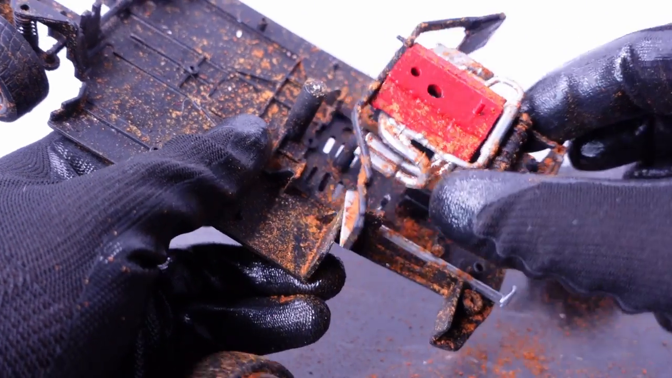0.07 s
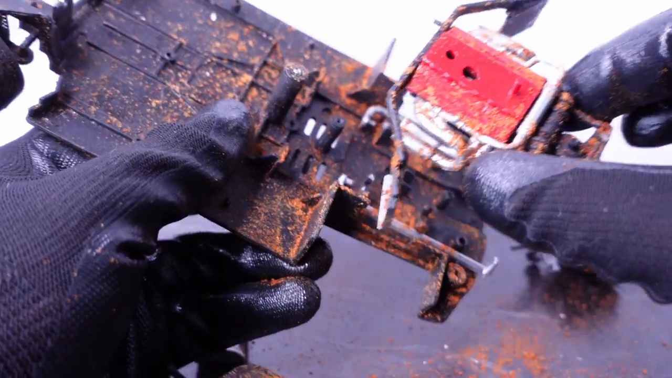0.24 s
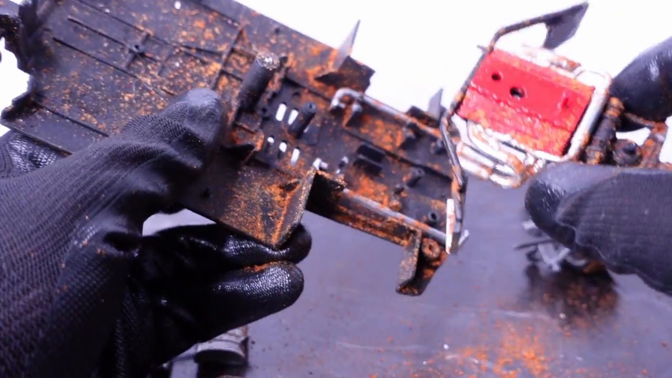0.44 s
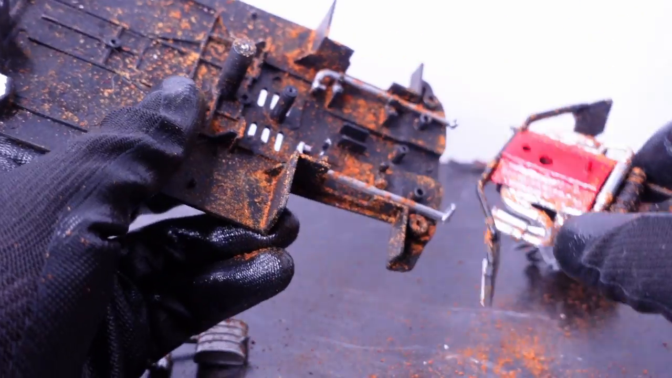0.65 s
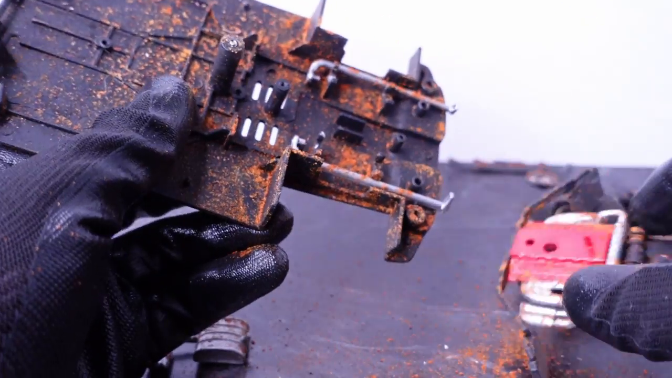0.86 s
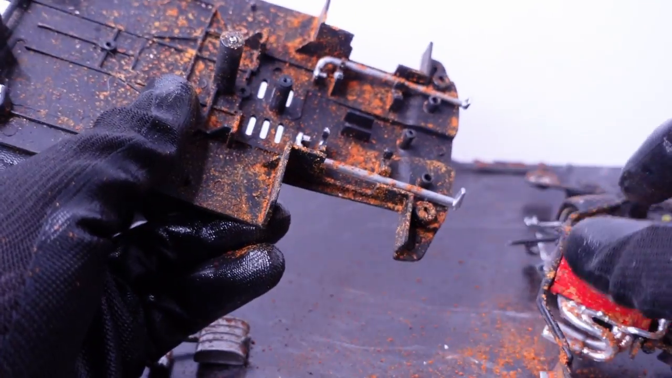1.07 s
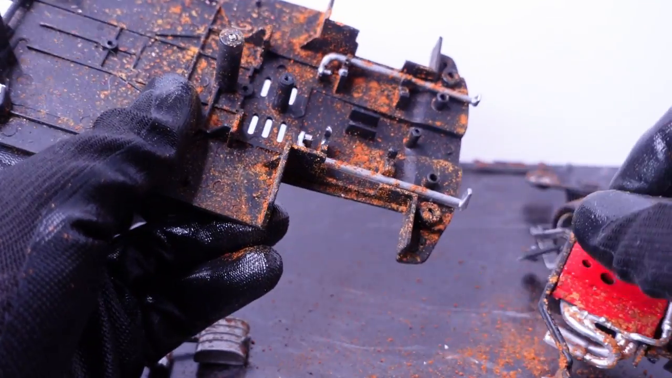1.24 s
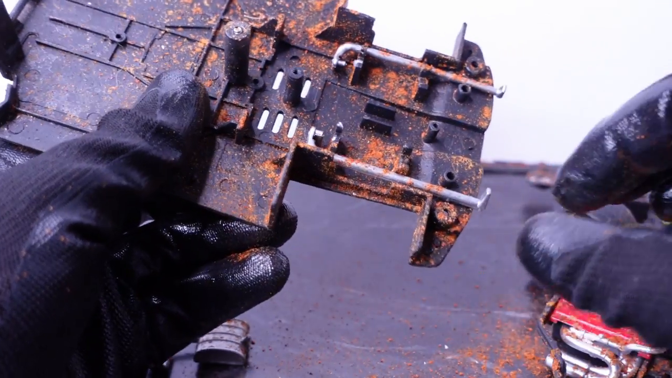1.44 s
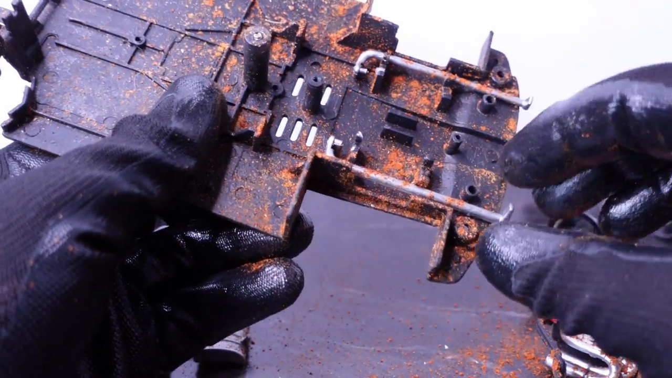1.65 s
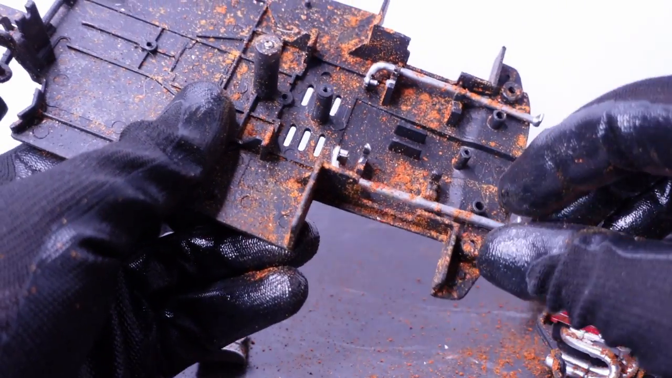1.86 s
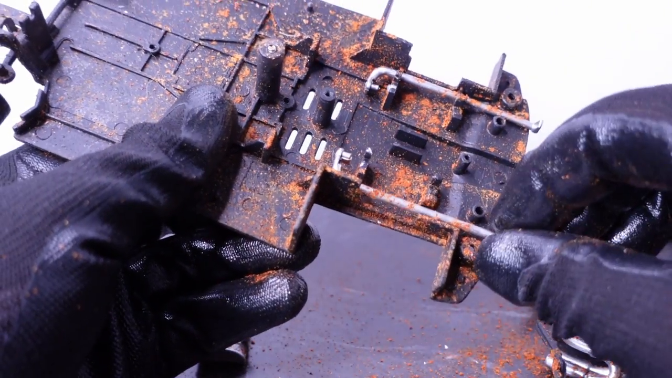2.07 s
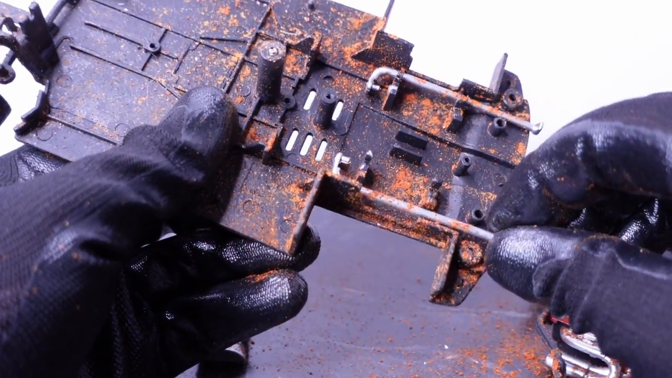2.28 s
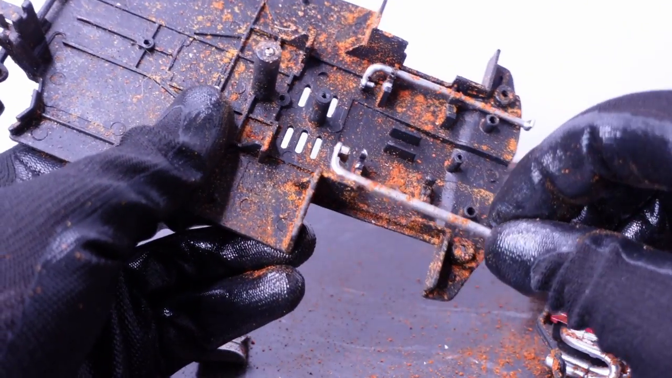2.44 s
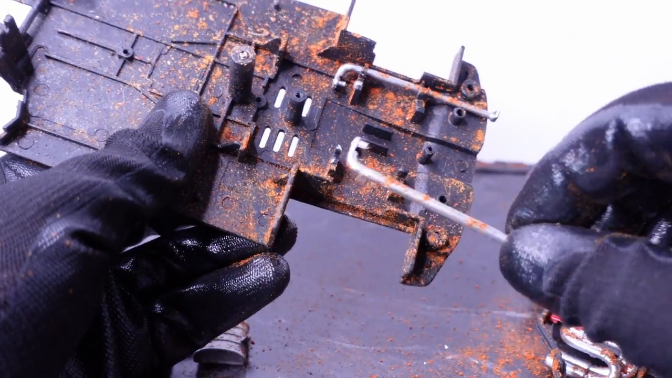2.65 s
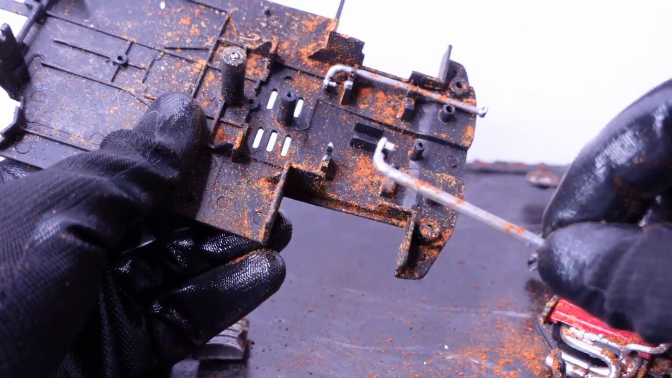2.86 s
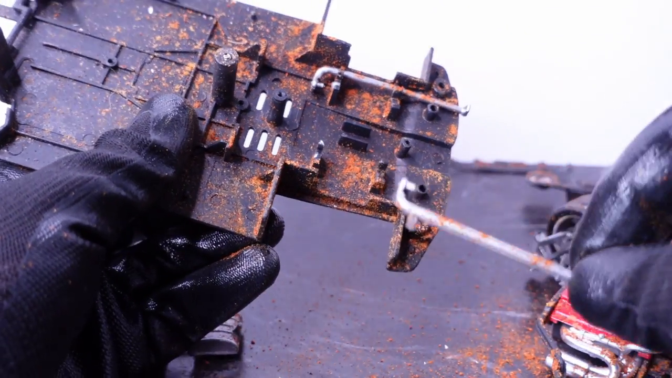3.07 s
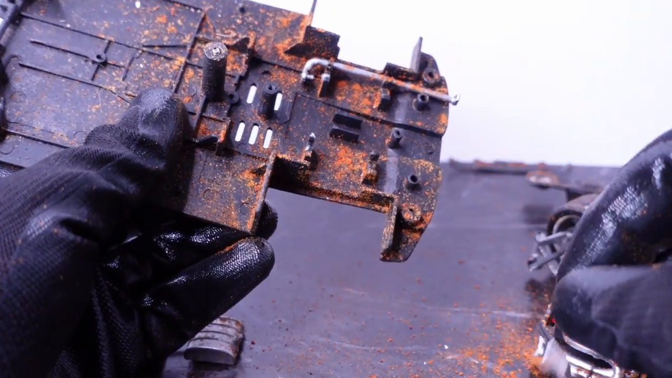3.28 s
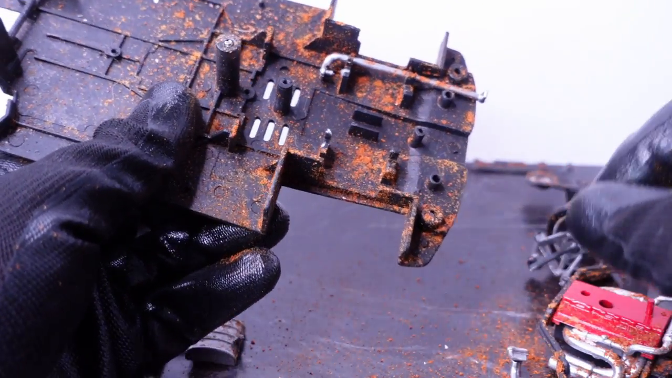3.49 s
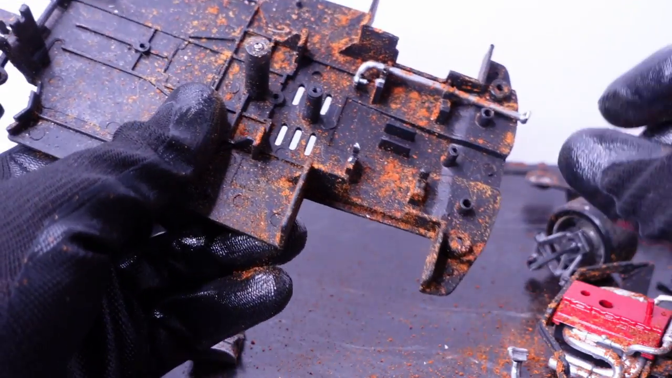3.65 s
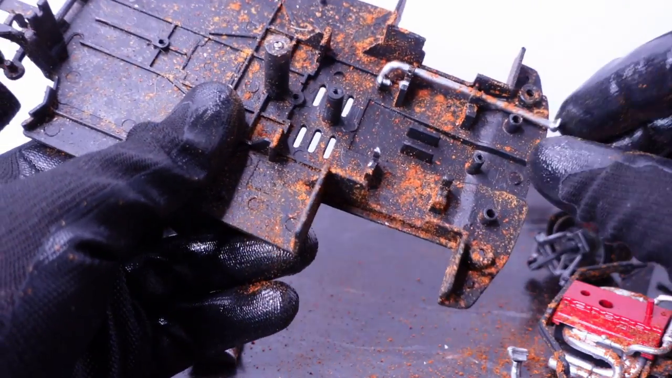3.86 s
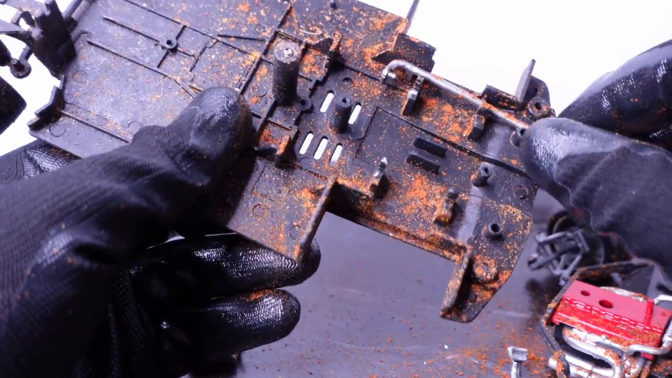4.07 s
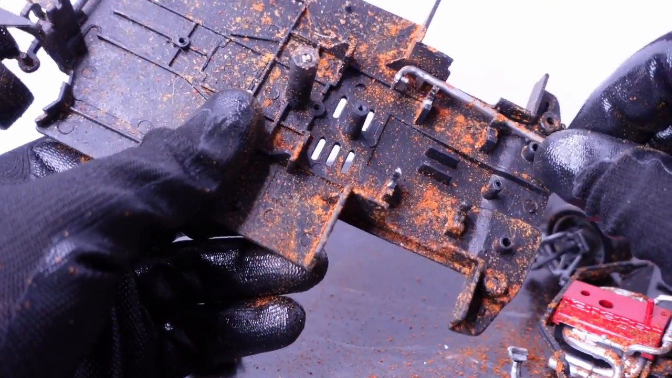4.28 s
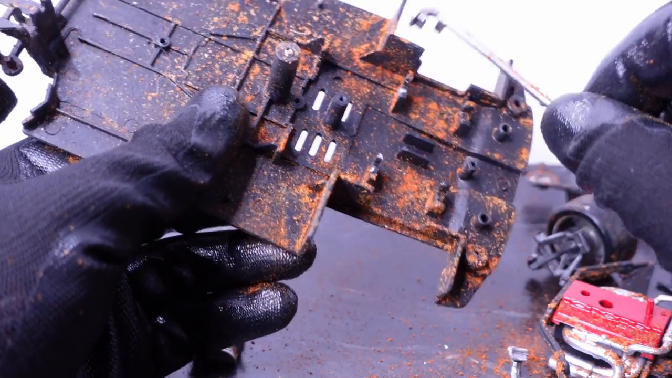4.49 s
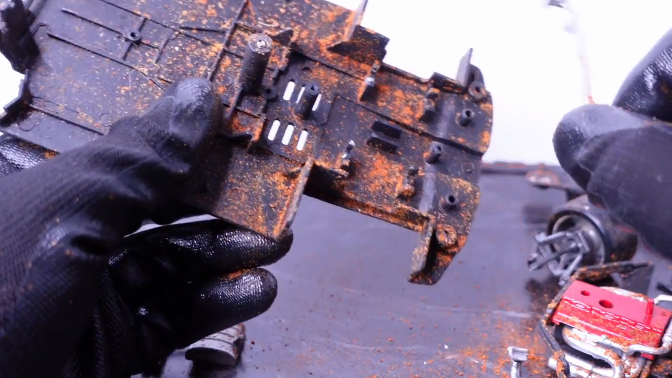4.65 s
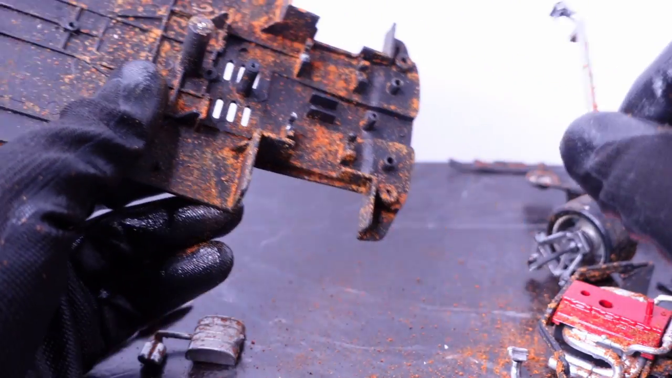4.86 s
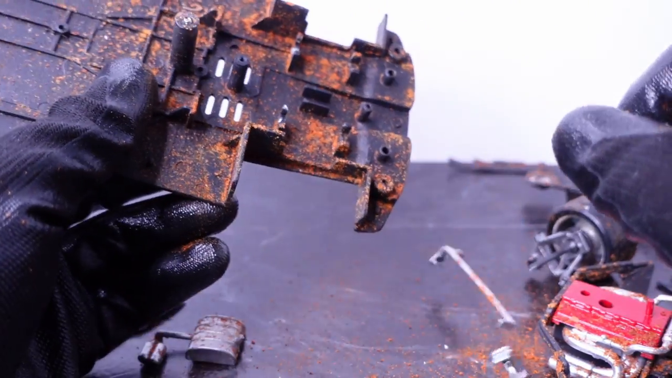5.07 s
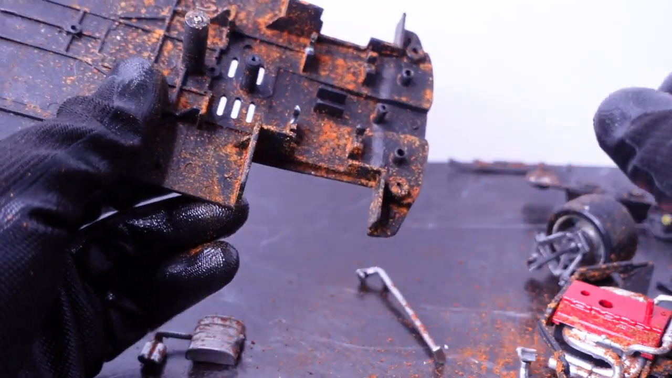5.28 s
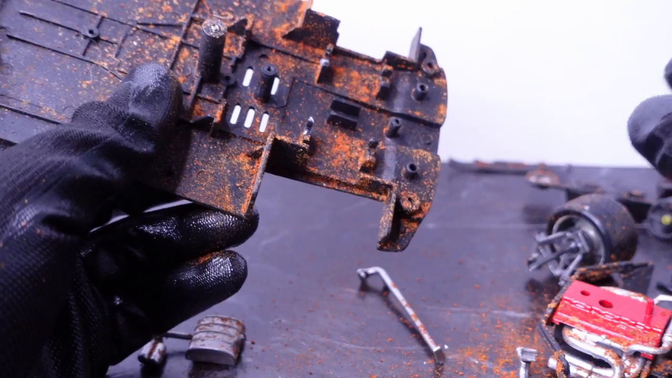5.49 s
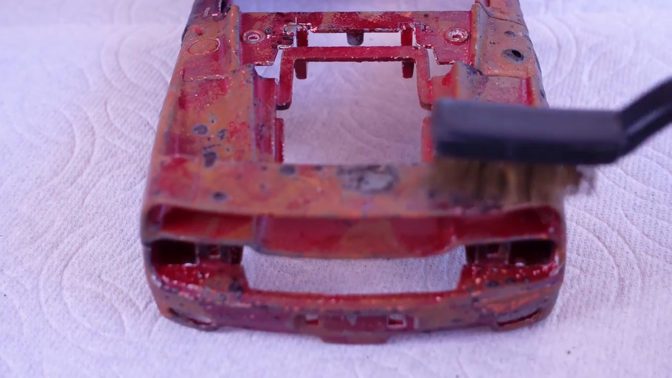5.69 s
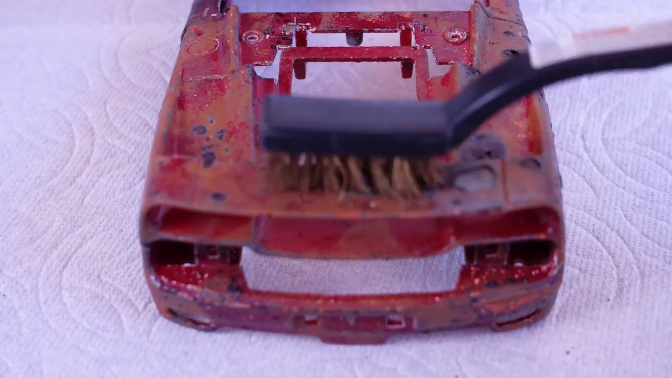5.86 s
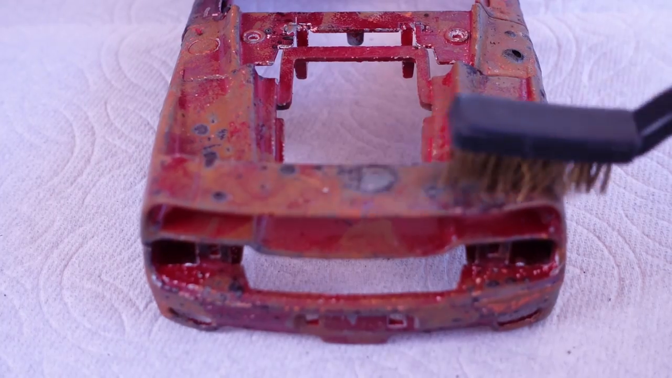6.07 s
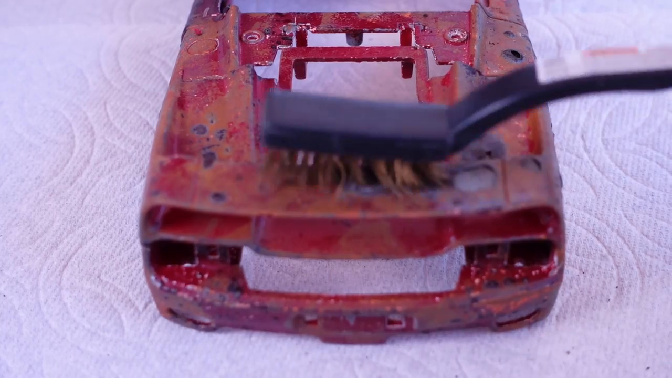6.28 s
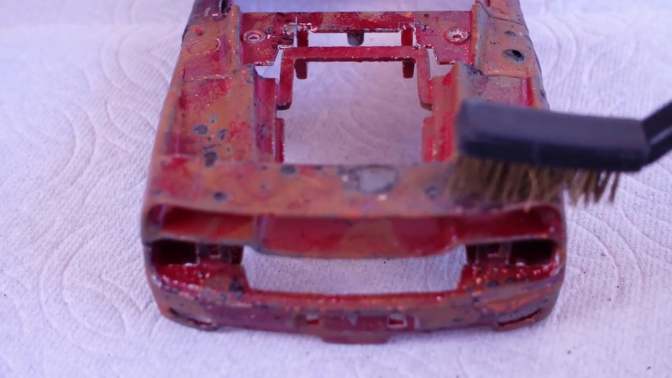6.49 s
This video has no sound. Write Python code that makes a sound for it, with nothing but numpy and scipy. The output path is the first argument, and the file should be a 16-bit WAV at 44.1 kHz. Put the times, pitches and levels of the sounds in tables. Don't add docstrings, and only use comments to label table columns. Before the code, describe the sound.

Very close handling in a small quiet room: glove rustle, gritty ticks and short rubbery creaks, then two hard knocks as a part is set down. Thin rods are worked loose and dropped, rattling on the tabletop, the last with a sharp metallic ping. A sudden cut brings rapid wire-bristle rasps, the thin shell ringing and booming beneath, with low puffs of air at the microphone.

```python
import sys
import numpy as np
from scipy import signal
from scipy.fft import rfft, irfft
from scipy.io import wavfile

SR = 44100
rng = np.random.default_rng(int(sys.argv[2]) if len(sys.argv) > 2 else 0)


def voltage_ratio(decibels):
    exponent = np.asarray(decibels, float) / 20
    return 10 ** exponent


def log_audio(samples):
    frames = np.atleast_2d(samples).T
    limited = np.clip(frames, -1, 1)
    pcm = np.round(limited * 32767).astype(np.int16)
    wavfile.write(sys.argv[1], SR, pcm)


N = 287973


def rms_one(x):
    return x / np.sqrt(np.mean(x ** 2) + 1e-20)


def band(x, low_hz, high_hz, order=2):
    sos = signal.butter(order, [low_hz, min(high_hz, .45 * SR)], "band", fs=SR, output="sos")
    return signal.sosfilt(sos, x)


def drift(rate_hz):
    r = np.exp(-2 * np.pi * rate_hz * 8 / SR)
    slow = signal.lfilter([1], [1, -2 * r, r * r], rng.standard_normal(N // 8 + 4002))[4000:]
    return np.interp(np.arange(N) / 8, np.arange(len(slow)), rms_one(slow))


def ring(x, hz, t60_s):
    r, w = voltage_ratio(-60 / (t60_s * SR)), 2 * np.pi * hz / SR
    return signal.lfilter([0, np.sin(w)], [1, -2 * r * np.cos(w), r * r], x + 1e-18)


def resonate(x, hz, width_hz):
    r = np.exp(-np.pi * width_hz / SR)
    b = np.array([1, 0, -1]) * (1 - r * r) / 2
    return signal.lfilter(b, [1, -2 * r * np.cos(2 * np.pi * hz / SR), r * r], x)


def colour(x, spectrum):
    hz, points = np.arange(N // 2 + 1) * SR / N + 1, np.array(spectrum)
    gain_db = np.interp(np.log(hz), np.log(points[:, 0]), points[:, 1])
    return rms_one(irfft(rfft(x) * voltage_ratio(gain_db), N))


def grains(per_s, spread_db, hiss):
    sizes = voltage_ratio(spread_db * np.minimum(rng.exponential(1, N), 5)) * rng.choice([-1, 1], N)
    return rms_one(sizes * (rng.random(N) < per_s / SR)) + hiss * rng.standard_normal(N)


def swells(rows, rest_db):
    t = np.arange(0, N, 64) / SR
    power = voltage_ratio(rest_db) ** 2
    for s, fade_s, db in rows:
        side_s = fade_s * np.where(t < s, 0.8, 1)
        power = power + voltage_ratio(db - 17.5 * np.abs(t - s) / side_s) ** 2
    return np.interp(np.arange(N) / SR, t, 10 * np.log10(power))


def room(x):
    t60_s, level_db = 0.32, -17
    t = np.arange(SR // 2) / SR
    reply = band(rng.standard_normal(len(t)), 300, 21000, order=1) * voltage_ratio(-60 * t / t60_s) * (t > .004)
    return voltage_ratio(level_db) * signal.fftconvolve(x, reply / np.sqrt(np.sum(reply ** 2)))[:N]


def rumble(level_db, low_hz, upper):
    low = band(rng.standard_normal(N), low_hz, 2.66 * low_hz, order=3)
    low = low + upper * band(rng.standard_normal(N), 33, 150)
    return voltage_ratio(level_db + 0.73 * drift(18)) * rms_one(low)


def bumps():
    # time in seconds, peak in dB, pitch in Hz, t60 in seconds.
    pushes = [(0.1043, -31.5, 127, 0.061), (0.1062, -28, 253, 0.027), (.391, -41, 36.7, .081),
              (.893, -34, 47.8, .071), (1.384, -22.5, 227, 0.046), (1.385, -25, 122, 0.051),
              (1.699, -17.5, 67, 0.014), (1.925, -25, 41, 0.13), (3.401, -48, 128.5, 0.086),
              (3.571, -47, 184, 0.027), (3.853, -19, 59, 0.014), (4.051, -43, 59, 0.22),
              (4.068, -44, 170, 0.055), (4.403, -28, 77, 0.043), (4.425, -31.5, 461, 0.032),
              (4.432, -42, 156, 0.071), (4.822, -41.5, 290, 0.12), (4.901, -39, 307, 0.097)]
    out = np.zeros(N)
    for s, level_db, hz, t60_s in pushes:
        push = np.zeros(N)
        push[round(s * SR)] = -voltage_ratio(level_db)
        out += 2 * resonate(ring(push, hz, t60_s), hz, 0.41 * hz)
    return out


def air():
    # time in seconds, fade time in seconds, level in dB.
    gusts = [(5.6, 0.1, -46), (5.91, 0.32, -40), (6.24, 0.12, -33), (6.53, 0.23, -36)]
    gust_db = swells(gusts, -52)
    hum = rms_one(resonate(resonate(rng.standard_normal(N), 40, 14), 40, 14))
    return rumble(gust_db, low_hz=8, upper=.02) + voltage_ratio(gust_db - 9) * hum


def puffs():
    # time in seconds, pressure (full scale 1), pitch in Hz.
    pushes = [(6.146, -.04, 21), (6.213, .055, 38), (6.248, -.06, 55), (6.262, .19, 15)]
    out, t = np.zeros(N), np.arange(N) / SR
    for s, pressure, hz in pushes:
        out += pressure * np.cos(2 * np.pi * hz * (t - s)) * np.exp(-(hz * (t - s) / .85) ** 2)
    return out


def gloves():
    # fastest moment
    # in seconds, fade time in seconds, rubbing in dB, crackle in dB.
    moves = [(.03, 0.53, -62.5, -63), (0.208, 0.056, -50.5, -48), (.29, 0.1, -57.5, -52.5),
             (0.387, 0.031, -57, -51.5), (.47, 0.18, -55.5, -55.5), (.62, 0.83, -61, -57.5),
             (0.793, 0.053, -56, -49.5), (0.911, 0.095, -43, -53), (1.039, 0.16, -42.5, -49.5),
             (1.346, 0.074, -41.5, -55), (1.424, 0.055, -37, -54), (1.62, 0.23, -61.5, -63),
             (1.759, 0.4, -63, -73), (1.944, 0.067, -49, -50.5), (2.08, 0.12, -57.5, -67.5),
             (2.25, 0.16, -61, -64.5), (2.462, 0.11, -54, -63.5), (2.655, 0.18, -64.5, -57.5),
             (3.13, 0.41, -59, -72), (3.36, 0.22, -50, -58), (3.628, 0.21, -61, -53),
             (3.88, 0.21, -61, -58), (4.034, 0.047, -46.5, -49), (4.22, 0.27, -53.5, -55.5),
             (4.43, 0.089, -54, -40.5), (4.5, 0.23, -57.5, -58.5), (4.78, 0.26, -55, -59.5),
             (4.927, 0.051, -44, -64), (5.129, 0.072, -44.5, -62), (5.28, 0.21, -55.5, -55.5)]
    # time in seconds, fade time in seconds, level in dB.
    sways = [(.14, 0.31, -44), (.35, 0.28, -45), (.48, 0.16, -44), (.72, 0.053, -52), (.93, 0.37, -43.5),
             (1.4, 0.17, -36), (1.62, 0.14, -45), (1.76, 0.11, -45.5), (1.94, 0.12, -38),
             (2.08, 0.076, -45.5), (2.28, 0.28, -47), (2.8, 0.7, -46.5), (3.18, 0.21, -50.5),
             (3.55, 0.62, -47.5), (3.9, 0.2, -39.5), (4.03, 0.061, -47), (4.22, 0.13, -41),
             (4.4, 0.21, -38), (4.86, 0.32, -46), (5.5, 0.17, -50.5)]
    # frequency in Hz, level in dB per Hz.
    rubbing = [(76, -27.5), (130, -5), (516, -4), (1420, -8), (1770, -8), (1980, -8), (6000, -21),
               (7800, -49), (13200, -120)]
    # frequency in Hz, level in dB per Hz.
    crackling = [(2000, -14.5), (3500, -5.5), (6000, -6), (8000, -0.5), (10400, -11.5), (12500, -8.5),
                 (15800, -13.5)]
    rub_db = swells([(s, fade_s, db) for s, fade_s, db, _ in moves], -74.5)
    crackle_db = swells([(s, fade_s, db) for s, fade_s, _, db in moves], -71)
    rumble_db = swells(sways, -63.5)
    bursts = drift(44)
    rub = voltage_ratio(rub_db + bursts + 2.6 * drift(36)) * colour(grains(1500, spread_db=3.0, hiss=0.93), rubbing)
    crackle = colour(grains(1200, spread_db=3.5, hiss=0.88), crackling)
    crackle = crackle + (voltage_ratio(0.76 * drift(1.7)) - 1) * band(crackle, 6200, 17000)
    crackle = voltage_ratio(crackle_db + 2.0 * bursts + 2.1 * drift(60)) * crackle
    return rub + crackle + rumble(rumble_db - 2.0, low_hz=12.0, upper=0.21)


def creaks():
    # start in seconds, length in seconds, first and last slips per second, level in dB.
    rubber = [(0.179, 0.057, 147, 510, -31), (1.145, 0.034, 105, 227, -26),
              (3.6305, 0.022, 136, 156, -33.5), (3.658, 0.035, 156, 270, -40.5),
              (3.679, 0.021, 120, 186, -40), (3.71, 0.034, 77, 100, -35)]
    # start in seconds, length in seconds, slips per second, level in dB, Hz.
    squeaks = [
        (3.582, .07, 300, -42, 12500),
        (2.47, .06, 70, -43, 1500),
    ]
    rows = [(*row, 1530) for row in rubber]
    rows += [(s, length_s, per_s, per_s, db, hz) for s, length_s, per_s, db, hz in squeaks]
    out, t = np.zeros(N), np.arange(N) / SR
    wobble = 1 + 0.03 * drift(60)
    for s, length_s, first_per_s, last_per_s, level_db, hz in rows:
        share = (t - s) / length_s
        inside = (share >= 0) & (share < 1)
        per_s = first_per_s + (last_per_s - first_per_s) * share ** 2
        turns = np.cumsum(inside * wobble * per_s) / SR + 1 - 1e-3
        slip_db = level_db - 6 * np.clip(share, 0, 1) + .7 * drift(150)
        slips = np.diff(np.floor(turns), prepend=0) * voltage_ratio(slip_db)
        edge, slips = band(slips, 6500, 9000), band(slips, .62 * hz, 2.4 * hz)
        t60_s = .0042 * min(1, (4000 / hz) ** 2)
        out += ring(slips, hz, t60_s) + 0.8 * ring(slips, 1.65 * hz, .6 * t60_s)
        out += .2 * (hz < 2000) * edge
    return out


def snaps():
    # time in seconds, peak in dB.
    peels = [(2.729, -29), (2.734, -38), (2.746, -40), (2.7637, -40), (2.7752, -42), (2.785, -40),
             (2.79, -49), (2.7967, -44), (2.815, -48), (2.8343, -41), (2.842, -39), (2.848, -40),
             (2.853, -45), (4.2335, -36), (4.2364, -20), (4.243, -30), (4.253, -42), (4.27, -37),
             (4.284, -40), (4.29, -41), (4.2955, -39), (4.309, -44), (4.312, -46), (4.3745, -33),
             (4.408, -21), (4.419, -34), (4.4445, -21), (4.4545, -32)]
    t60_s, body_db = 0.0038, -10
    clicks = np.zeros(N)
    for s, level_db in peels:
        clicks[round(s * SR)] = voltage_ratio(level_db)
    tail = signal.lfilter([.6], [1, -voltage_ratio(-60 / (t60_s * SR))], clicks + 1e-18)
    burst = clicks + tail * rng.standard_normal(N)
    return 2 * band(burst, 13000, 14000) + 2 * voltage_ratio(body_db) * band(burst, 3700, 9200)


def rod():
    # frequency in Hz, level in dB, t60 in seconds.
    rod_modes = [(2230, -13, .093), (3612, 2, .25), (4199, -15, .45), (5803, -12, .3), (7106, -1, .2),
                 (8333, -2, .3), (10930, -21, .4), (11320, -13, .22), (11910, -27, .3), (14960, -26, .17),
                 (15650, -17, .21)]
    flick_s, lands_s, level_db = 4.891, 5.07, -38
    click = np.zeros(N)
    click[round(flick_s * SR)] = voltage_ratio(level_db)
    tone = sum(voltage_ratio(db) * ring(click, hz, t60_s) for hz, db, t60_s in rod_modes)
    return tone * voltage_ratio(-60 * np.maximum(np.arange(N) / SR - lands_s, 0) / 0.027)


def pings():
    # time in seconds, peak in dB, frequency in Hz, t60 in seconds.
    singing = [(.853, -42, 4520, 0.027), (2.468, -45, 3300, 0.018), (2.4827, -35, 3430, 0.014),
               (2.49, -35, 3530, 0.011), (2.5055, -38.5, 3540, 0.013), (2.53, -43, 3600, 0.02),
               (2.537, -41, 3700, .01), (4.0085, -25.5, 1600, 0.012), (4.2082, -26.5, 1410, 0.011),
               (.8875, -17.5, 2150, 0.025), (1.3839, -9, 1930, .012), (1.383, -15, 3420, 0.021),
               (1.385, -14.5, 2740, 0.024), (1.387, -17, 3680, .015), (1.39, -19, 4710, 0.014),
               (3.2785, -18, 3560, 0.02), (.855, -35, 2480, 0.035), (0.9395, -24, 4540, 0.02),
               (.968, -14.5, 4350, 0.025), (0.975, -23.5, 4460, 0.015), (1.0384, -20, 5020, 0.023),
               (1.0695, -28.5, 5050, 0.029), (1.362, -40, 5050, 0.078), (1.3875, -29, 9100, 0.024),
               (1.389, -20, 6730, 0.017), (1.418, -28, 6630, 0.019), (4.4075, -21, 5180, 0.013),
               (4.442, -25, 4310, 0.045), (5.071, -10.5, 7360, 0.014), (5.071, -19, 12100, .015),
               (5.0848, -17, 11930, 0.016), (5.0835, -24, 13400, 0.014), (5.085, -24, 8000, 0.024),
               (5.0855, -31, 5940, 0.044), (5.087, -30, 2870, 0.05), (5.163, -26, 5560, 0.015),
               (5.241, -32, 7320, 0.053), (5.2755, -31, 7400, 0.022)]
    out, click = np.zeros(N + 5000), np.eye(1, 5000)[0]
    rise = 1 - np.exp(-np.arange(5000) / SR / .0006)
    for s, level_db, hz, t60_s in singing:
        at = round(s * SR)
        out[at:at + 5000] += voltage_ratio(level_db) * ring(click, hz, min(t60_s, .06)) * rise
    return out[:N]


def contacts(rows, click, modes_db, rise_s=1e-5, soften=0):
    # frequency in Hz, level in dB, t60 in seconds.
    part_modes = [(1400, -15, 0.021), (2297, -3.5, 0.036), (2690, 16.5, 0.005), (3400, 1, 0.007),
                  (4430, -14.5, 0.014), (5050, 5.5, 0.013), (6700, -6.5, 0.0086), (9070, -16, 0.02),
                  (12300, -33, .03)]
    # frequency in Hz, level in dB, t60 in seconds.
    table_modes = [(148, -19, 0.13), (284, 5.5, 0.035), (359, 7, 0.023), (494, -4, 0.037),
                   (740, -36, 0.064)]
    t = np.arange(5000) / SR
    noises = rng.standard_normal((len(rows), len(t)))
    strengths_db = rng.normal(0, 5, (len(rows), len(part_modes)))
    out, thuds = np.zeros(N + len(t)), np.zeros(N)
    for (s, level_db, edge_db, hz, t60_s, thud_db), noise, strength_db in zip(rows, noises, strengths_db):
        chatter = noise * voltage_ratio(-60 * t / np.clip(t60_s, .003, .15)) * (1 - np.exp(-t / rise_s))
        chatter[0] = click * min(1, 0.0099 / t60_s) ** soften
        body = band(chatter, 0.36 * hz, 2.4 * hz) + 3 * resonate(chatter, hz, 0.34 * hz)
        modes = sum(voltage_ratio(db + d) * ring(chatter, f, mode_t60_s)
                    for (f, db, mode_t60_s), d in zip(part_modes, strength_db))
        body = body / np.abs(body).max() + voltage_ratio(modes_db) * modes / np.abs(modes).max()
        edge = chatter * voltage_ratio(-60 * t / 0.023)
        edge = band(edge, 4500, 10750) + 0.77 * band(edge, 10000, 15000)
        at = round(s * SR)
        out[at:at + len(t)] += voltage_ratio(level_db) * (body + voltage_ratio(edge_db - 2.5) * edge / np.abs(edge).max())
        thuds[at] += voltage_ratio(level_db + thud_db - 5.5)
    soft = signal.lfilter([.1], [1, -.9], thuds)
    table = sum(voltage_ratio(db) * ring(soft, hz, t60_s) for hz, db, t60_s in table_modes)
    return out[:N] + band(table, 130, 3000)


def small_contacts():
    # time in seconds, peak in dB, main pitch in Hz.
    taps = [(0.4464, -33.5, 1440), (0.7595, -38, 3380), (1.2, -47, 1260), (1.315, -44, 2290),
            (1.716, -34.5, 1540), (1.789, -39, 1600), (1.821, -45.5, 1520), (2.004, -40, 1520),
            (2.08, -38, 3480), (2.2047, -43, 3149), (2.2596, -36, 3260), (2.297, -40.5, 1910),
            (2.4363, -42, 4910), (3.479, -36, 3360), (3.798, -45, 1300), (3.82, -44, 1270),
            (3.896, -31, 1300), (3.903, -38, 1450), (3.912, -37, 1195), (3.926, -43, 1290),
            (3.865, -40, 1600), (3.991, -36, 2600), (4.019, -45, 1500), (4.308, -35.5, 3870),
            (4.32, -42, 810), (1.3312, -19, 2350), (1.252, -51, 1490), (3.318, -32, 2000),
            (3.9872, -35.5, 1580), (5.461, -43, 2100), (5.4696, -36.5, 5860), (5.4863, -30.5, 3740),
            (5.5488, -35, 2950), (5.5654, -37.5, 2280), (5.581, -42, 2500)]
    # time in seconds, peak in dB.
    grit = [(0.083, -57), (0.107, -62), (0.1501, -57), (0.1797, -32.5), (0.27, -38.5), (0.314, -38),
            (0.361, -41), (0.3733, -35.5), (0.391, -37.5), (0.467, -37), (0.4907, -43), (0.579, -43),
            (1.1767, -39), (1.2, -46), (1.293, -47), (1.307, -45.5), (1.318, -43), (1.337, -35.5),
            (3.546, -54), (3.558, -53), (3.572, -54), (3.579, -56), (4.92, -46), (4.947, -50), (1.919, -52),
            (2.165, -44.5), (2.954, -47.5), (3.148, -38), (3.189, -35), (2.6476, -42.5), (2.8718, -46.5),
            (3.863, -38.5), (4.118, -45), (4.184, -38), (5.178, -30), (5.3624, -52.5), (5.504, -44.5)]
    # time in seconds, peak in dB.
    ridges = [(3.0296, -27), (3.069, -24.5), (3.1, -23), (3.1241, -24.5), (3.1446, -22.5), (3.1645, -25),
              (3.1857, -30), (3.2085, -29), (3.2266, -26), (3.244, -29)]
    # time in seconds, peak in dB, pitch in Hz.
    grinds = [(2.9208, -40, 2500), (2.945, -36, 2340), (2.963, -50, 2300), (2.977, -48, 1980),
              (2.982, -37, 2340), (3.0243, -33.5, 2300), (3.051, -33.5, 2300), (3.0714, -40, 2400),
              (3.082, -67, 2400), (3.102, -36, 2600)]
    ticks = [(s, db, -18.5, hz, .02, -30) for s, db, hz in taps]
    ticks += [(s, db, 8.5, 1600, .02, -30) for s, db in grit]
    clicking = [(s, db, -9, 2600, .007, -28) for s, db in ridges]
    grinding = [(s, db, -8, hz, .025, -30) for s, db, hz in grinds]
    crisp = contacts(clicking, click=14, modes_db=-30)
    dull = contacts(ticks, click=8.8, modes_db=-39.5)
    return dull + crisp + contacts(grinding, click=0, modes_db=-20, rise_s=0.00023)


def knocks():
    # time in seconds, peak in dB, bright edge in relative dB,
    # main pitch in Hz, table thud in relative dB.
    block = [(0.8861, -6.5, -33, 3300, -27.5), (0.9658, -5.5, -24.5, 2660, -10.5),
             (1.008, -30, -15, 2150, -10.5), (1.0371, -13.5, -30, 4000, -10), (1.068, -22, -24, 4570, -7),
             (1.3614, -18.5, -25.5, 1850, -6), (1.3837, -1.5, -37, 2820, -26.5),
             (0.974, -12, -17, 4430, -21), (1.079, -25.5, -21, 2360, -11), (1.391, -16.5, -12, 3500, -21)]
    # time in seconds, peak in dB, bright edge in relative dB,
    # main pitch in Hz, chatter t60 in seconds.
    drops = [(3.2699, -15.5, -0.5, 2900, 0.04), (3.2763, -12, -27, 3430, 0.026),
             (3.332, -22.5, -9, 2820, 0.012), (3.3779, -12, -29, 3450, 0.021),
             (3.44, -25, -19, 6950, 0.045), (3.448, -29, -11, 2520, 0.015), (3.345, -47, -15, 2800, 0.013),
             (5.0708, -3.5, -12, 2000, 0.012), (5.0732, -16, -18, 2200, 0.022),
             (5.083, -15.5, 8.5, 3300, 0.031), (5.113, -29.5, 5.5, 5200, .027),
             (5.1626, -16.5, -34, 4100, 0.022), (5.249, -26, -1, 2980, 0.038),
             (5.24, -27, 13.5, 5430, 0.13), (5.275, -27.5, 9.5, 2600, 0.044),
             (5.2925, -36.5, 13.5, 2620, 0.073)]
    # time in seconds, peak in dB, main pitch in Hz, chatter t60 in seconds.
    prying = [(2.451, -32, 5100, 0.05), (4.009, -26.5, 1447, 0.0074), (4.065, -31, 1900, 0.027),
              (4.184, -34, 1770, 0.039), (4.186, -32.5, 735, 0.019), (4.193, -43, 1900, .015),
              (4.033, -51, 1900, 0.024), (4.2088, -33, 1350, 0.015), (4.2361, -23, 3560, 0.007),
              (4.3748, -26, 4360, 0.024), (4.4071, -26, 1400, 0.095), (4.421, -21.5, 1400, 0.097),
              (4.439, -13.5, 2360, 0.026), (4.4447, -19, 1600, 0.04), (4.5032, -32, 2520, 0.023),
              (4.883, -30, 2060, 0.014), (4.8912, -20.5, 2500, 0.069)]
    # time in seconds, peak in dB, main pitch in Hz, table thud in relative dB.
    scuffs = [(0.851, -19.5, 2180, -18), (0.9364, -23.5, 2360, -25), (1.329, -29, 2220, -22),
              (1.4138, -25, 3500, -10), (1.943, -29, 3240, -38.5), (4.3873, -31.5, 1336, -22.5),
              (4.767, -40.5, 980, -5.5), (4.785, -34.5, 790, -14), (4.805, -49.5, 1020, 6),
              (4.825, -48, 900, 10), (4.165, -53, 747, -20), (4.91, -36.5, 830, -24),
              (5.197, -31, 2070, -12.5)]
    hits = [(s, db, edge_db, hz, 0.026, thud_db) for s, db, edge_db, hz, thud_db in block]
    for s, db, edge_db, hz, t60_s in drops:
        hits.append((s, db, edge_db, hz, t60_s, -38.5 + 0.99 * (db + 16.5) - db))
    for s, db, hz, t60_s in prying:
        hits.append((s, db, -48 + 18 * np.log2(hz / 1500), hz, t60_s, -29))
    glancing = [(s, db, -12.5, hz, 0.0079 + 71 / hz, thud_db) for s, db, hz, thud_db in scuffs]
    struck = contacts(hits, click=10.6, modes_db=-8.0, soften=0.82)
    return struck + contacts(glancing, click=0, modes_db=-25.0, rise_s=0.006)


def stroke_gain(level_db, follows, rest_db, lead_s):
    # start, fastest moment and end in seconds, bristle level in dB.
    strokes = [(5.503, 5.613, 5.688, -32), (5.726, 5.834, 5.903, -27), (5.897, 5.922, 5.968, -37.5),
               (5.941, 6.054, 6.125, -30), (6.145, 6.167, 6.215, -35.5), (6.158, 6.259, 6.325, -26.5),
               (6.309, 6.34, 6.4, -39.5), (6.356, 6.455, 6.54, -30)]
    t, power = np.arange(N) / SR + lead_s, voltage_ratio(rest_db) ** 2
    for start_s, peak_s, end_s, bristle_db in strokes:
        away = np.where(t < peak_s, (peak_s - t) / (peak_s - start_s), (t - peak_s) / (end_s - peak_s))
        power = power + voltage_ratio(level_db + follows * (bristle_db + 29.5) - 19 * away ** 2.94) ** 2
    return np.sqrt(power)


def brush():
    turns_s = [5.69, 5.957, 6.13, 6.36]
    # time in seconds, jump in dB.
    tuft_bites = [(5.7456, 7.5), (5.7625, 1), (5.778, 2.5), (5.828, 1), (5.84, 1.5), (5.862, -3.5),
                  (5.91, 9), (5.945, 3), (5.967, -2), (5.987, 5), (6.038, 4.5), (6.062, -3), (6.108, -8.5),
                  (6.1366, 0), (6.162, 6.5), (6.171, -7.5), (6.177, 6), (6.211, 0), (6.24, -3.5),
                  (6.309, -6), (6.3252, 4.5), (6.3636, 2), (6.42, 5.5), (6.46, -0.5)]
    # frequency in Hz, width in Hz, level in dB, dB gained on a push, lost on a pull.
    shell_modes = [(1944, 33, -1, -0.5), (2280, 51, 1.5, -3.5), (3300, 79, 5.5, -2.5), (4130, 100, 1, 2),
                   (4760, 18, 0, -7.5), (5905, 63, 9.5, -2), (6770, 54, 6, 0), (7180, 53, 2.5, 3),
                   (7580, 52, 2, -3.5), (7680, 47, -6, 10), (8740, 100, 4.5, -0.5), (10940, 150, -5.5, 1.5),
                   (11800, 125, -4.5, -4), (13100, 110, -6, 0)]
    # frequency in Hz, width in Hz, level in dB.
    boom_modes = [(90, 34, 6), (237, 68, -5), (451, 103, 0), (602, 112, -3.5), (722, 58, 4.5),
                  (1214, 193, -7)]
    # frequency in Hz, level in dB per Hz.
    bristles = [(900, -22), (1500, -5.5), (2600, -6.5), (4300, 2), (5200, -7.5), (5800, -0.5), (8900, -5.5),
                (9500, -11), (10300, -22), (11300, -11.5), (13000, -14), (15800, -18)]
    t = np.arange(N) / SR
    push = -np.prod([np.tanh((t - s) / 0.013) for s in turns_s], axis=0)
    bites = voltage_ratio(sum(db * (t > s) * np.exp(-np.abs(t - s) / 0.021) for s, db in tuft_bites))
    snags = voltage_ratio(1.9 * drift(150) + .5 * drift(40))
    tips = snags * grains(6000, spread_db=1.5, hiss=0.5)
    modes, boom = 0, 0
    for k, (hz, width_hz, db, lean_db) in enumerate(shell_modes):
        gain = voltage_ratio(db + lean_db * push + 3 * drift(18))
        modes = modes + (-1) ** k * gain * resonate(tips, hz, 1.4 * width_hz)
    flakes = snags * grains(5000, spread_db=3.0, hiss=.6)
    wires = rms_one(1.25 * rms_one(modes) + colour(flakes, bristles))
    for k, (hz, width_hz, db) in enumerate(boom_modes):
        mode = resonate(resonate(tips, hz, 3 * width_hz), hz, width_hz)
        boom = boom + (-1) ** k * voltage_ratio(db + 1.87 * drift(4.5)) * mode
    bright = stroke_gain(-30, 1, -46, lead_s=0) * rms_one(band(wires, 5000, 19000))
    fizz = stroke_gain(-62, 0.33, -56, lead_s=0) * rms_one(band(flakes, 12500, 17000))
    dull = stroke_gain(-42, 0.99, -56, lead_s=0) * rms_one(band(wires, 1800, 5000))
    low = stroke_gain(-39.5, 1.43, -56, lead_s=.008) * rms_one(boom)
    return bites * (bright + dull + fizz) + low + air() + puffs()


def scene():
    change_s = 5.604
    after = np.clip((np.arange(N) / SR - change_s) / 0.0041, 0, 1)
    hits = knocks() + small_contacts() + creaks() + rod() + pings() + snaps()
    handling = hits + room(hits) + gloves() + bumps()
    return (handling * (1 - after) + brush() * after)[None]


def top_cut(x):
    return signal.sosfilt(signal.butter(12, 17000, fs=SR, output="sos"), x)


def record(dry):
    rounded = 1.1 * np.tanh(dry / 1.1)
    low_pass = signal.ellip(10, .5, 60, 15700, fs=SR, output="sos")
    return top_cut(signal.sosfilt(low_pass, rounded))


dry = scene()
out = record(dry)
log_audio(out)
```